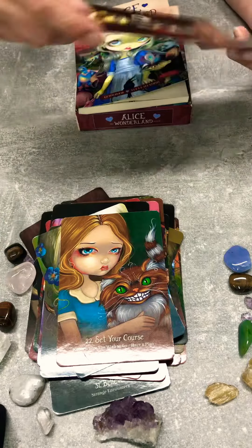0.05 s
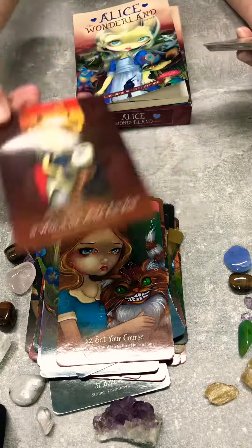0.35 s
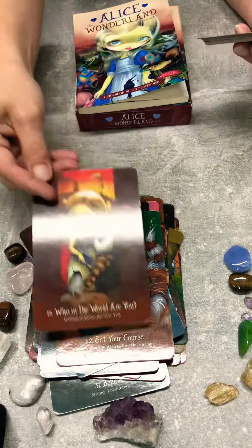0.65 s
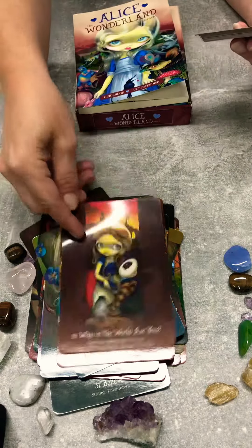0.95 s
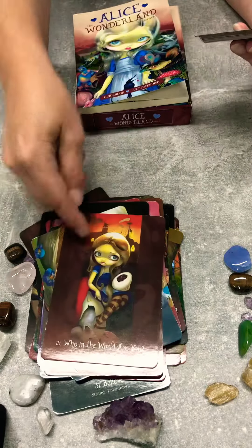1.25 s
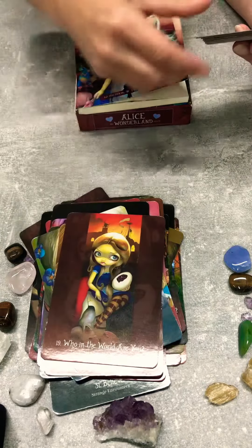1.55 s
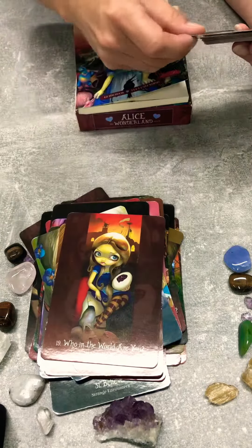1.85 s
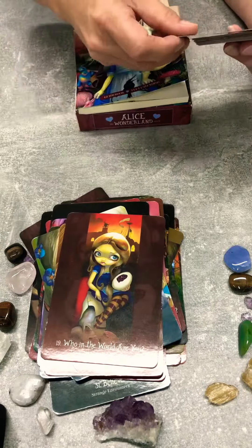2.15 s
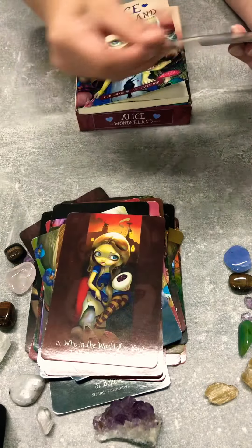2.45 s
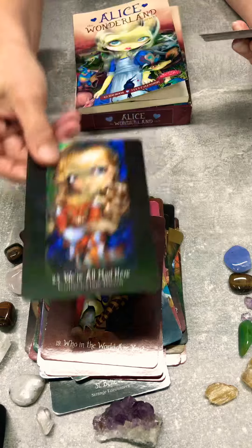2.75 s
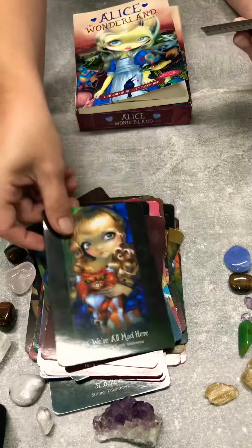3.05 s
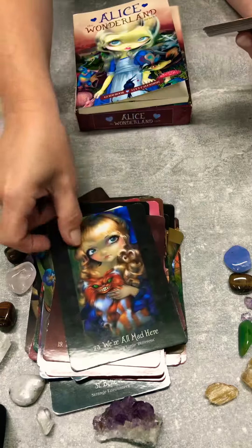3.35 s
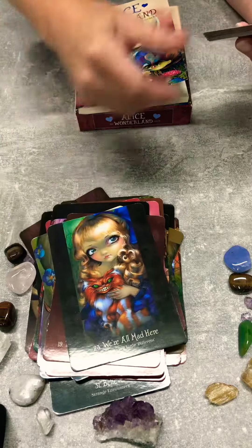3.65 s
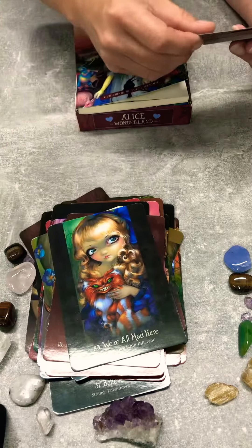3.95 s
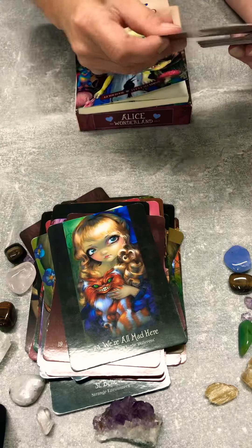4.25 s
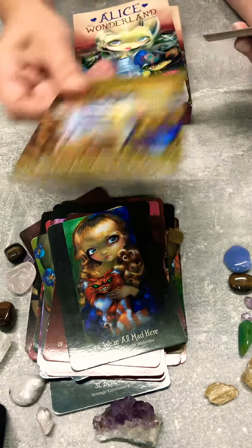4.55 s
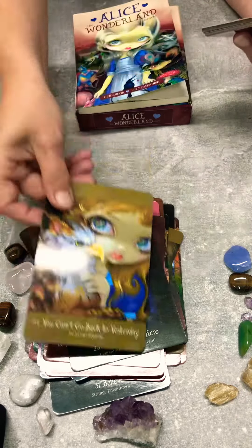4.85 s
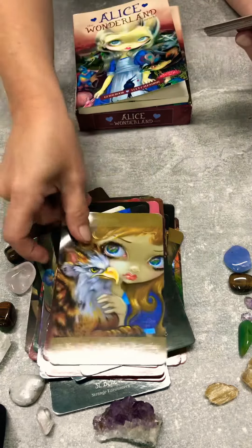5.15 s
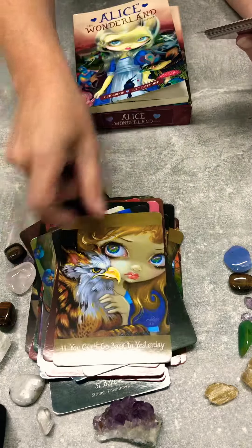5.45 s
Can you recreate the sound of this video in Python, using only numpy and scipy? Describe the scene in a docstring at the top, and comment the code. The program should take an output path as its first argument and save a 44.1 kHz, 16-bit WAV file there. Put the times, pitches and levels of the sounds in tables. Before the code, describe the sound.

Cards are laid down close by with light ticks and slides, as a bird sings a reverberant, varied phrase in a humming room.

```python
"""Cards swish and tick onto a pile close by, over a room's faint hum and a soft, distant twitter.
Then a songbird sings one phrase among echoing walls: low whistles and slurs, harsh rasps and trills,
and fainter chirps after them. Its membranes vibrate almost sinusoidally in a whistle and slap together
in a rasp; beak and throat filter the overtones. The cards sound by friction and by impact."""
import sys
import numpy as np
from scipy import signal
from scipy.fft import rfft, irfft, next_fast_len
from scipy.io import wavfile
from scipy.ndimage import uniform_filter1d, map_coordinates

SR = 44100
rng = np.random.default_rng(int(sys.argv[2]) if len(sys.argv) > 2 else 0)


def transcribe(u):
    """Save the signal u as a 16-bit wav file named by the first command-line argument.

    u: samples, shape (n,) or (channels, n), limited to [-1, 1]; the rate is SR.
    q: integer samples, one column per channel.
    """
    v = np.clip(np.atleast_2d(u).T, -1, 1)
    q = np.round(v * 32767).astype(np.int16)
    wavfile.write(sys.argv[1], SR, q)


N = 247401
TOP_HZ = 15900
# Overtone strength through the song. Each row: time in seconds, level in dB before the beak's filter.
OVERTONE_LEVELS = [(1.9, -35), (2.15, -28), (2.22, -35.5), (2.35, -39), (2.53, -30), (2.76, -44),
                   (3.05, -32), (3.2, -60), (3.46, -48), (3.6, -31), (5.5, -42)]


def syrinx(length, start_hz, end_hz, flutter_share, overtone_db):
    """Membrane tension sets pitch: a tone arches from start to end under frequency modulation."""
    t = np.arange(int(length * SR)) / SR
    progress = t / length
    arch = 0.2257 * abs(end_hz - start_hz) * (1 - (2 * progress - 1) ** 2)
    glide = start_hz + (end_hz - start_hz) * progress + arch
    centre_hz = (start_hz + end_hz) / 2
    flutter_hz = 85 * (centre_hz / 2070) ** 0.55 * (1 + 0.2346 * wobble(39.9, len(t)))
    flutter = np.sin(phase_of(flutter_hz) + rng.uniform(0, 2 * np.pi)) + 0.31 * wobble(304.8, len(t))
    pitch = glide * (1 + flutter_share * flutter)
    phase = phase_of(pitch)
    # Beak resonances that colour the overtones. Each row: frequency in Hz, gain in dB.
    beak = [(3300, -11), (4300, -13), (5300, -10.5), (7000, -27), (9000, -11.5), (10500, -20.5),
            (12300, -5.5), (13400, -32), (15000, -22), (16500, -43)]
    tone = np.sin(phase)
    for k in range(2, int(TOP_HZ / glide.max()) + 1):
        partial_db = overtone_db + along(beak, k * np.abs(pitch)) + 7.4 * wobble(56, len(t))
        tone += amp(partial_db) * np.sin(k * phase)
    shimmer = amp(1.4 * wobble(60, len(t)))
    return tone * shimmer


def whistles(edge_s=0.014, ring_rise_s=0.039, ring_t60=0.52):
    """Steady oscillation holds one pitch; reverberation sustains it after the note stops."""
    # Each row: start in seconds, length in seconds, pitch in Hz, level in dB, ring in dB against the note.
    held_notes = [(2.138, 0.11, 1782, -41, -1), (2.343, 0.095, 2065, -29.5, -18),
                  (2.436, 0.062, 2071, -32, -27), (2.673, 0.05, 2110, -29, -18),
                  (2.744, 0.094, 2348, -28, -6), (3.193, 0.026, 2119, -30, -21),
                  (3.347, 0.075, 1991, -31, -27), (3.472, 0.044, 1990, -38, -19.5),
                  (3.517, 0.048, 1985, -41.5, -12)]
    track, t = np.zeros(N), np.arange(SR) / SR
    for start, length, hz, db, ring_db in held_notes:
        overtone_db = np.interp(start, *np.transpose(OVERTONE_LEVELS))
        note = syrinx(length, hz, hz, flutter_share=0.003, overtone_db=overtone_db)
        heave = amp(2.5 * wobble(11, len(note)))
        note *= heave * swell(t[:len(note)], length, edge_s, edge_s)
        add(track, start, amp(db) * wall_echo(note, direct_db=5, build_s=0.0022))
        ring = np.sqrt(2) * np.sin(2 * np.pi * hz * t + 0.4 * wobble(11, SR))
        ring *= 1 - np.exp(-t / ring_rise_s)
        add(track, start + length, amp(db + ring_db - 60 * t / ring_t60) * ring)
    return track


def slurs():
    """Changing tension slides the pitch of each note; thin high tones sound with some of them."""
    # Each row: start and length in seconds, first and last pitch in Hz, level in dB,
    # flutter as a share of the pitch.
    glides = [(-.03, 0.1, 3804, 3610, -65, 0.033), (1.77, 0.072, 2026, 2024, -49.5, 0.005),
              (1.805, 0.063, 1960, 1658, -50.5, 0.026), (1.785, 0.076, 2290, 2500, -66, 0.011),
              (1.855, 0.015, 1700, 1710, -46, .01), (1.845, 0.038, 1480, 1440, -62, 0.018),
              (1.86, 0.041, 1920, 1830, -55, .025), (1.895, 0.031, 2430, 2400, -63, 0.013),
              (1.917, 0.023, 2134, 2070, -43, 0.016), (1.925, 0.085, 1890, 1706, -46.5, 0.027),
              (2.14, 0.095, 1718, 1758, -47, 0.029), (2.08, 0.061, 2685, 2840, -58, .015),
              (2.202, 0.03, 2050, 2120, -45, .012), (2.204, 0.085, 2170, 2545, -33, 0.012),
              (2.225, 0.1, 3110, 3970, -59.5, 0.018), (2.24, 0.079, 4940, 5240, -66.5, 0.017),
              (2.03, 0.068, 2640, 2670, -67, .008), (2.282, 0.055, 2458, 2565, -34, 0.0044),
              (2.475, 0.12, 2266, 2290, -38, 0.014), (2.505, 0.066, 2007, 1995, -39.5, 0.012),
              (2.508, 0.048, 2506, 2450, -44.5, 0.019), (2.54, 0.13, 3025, 3116, -56.5, 0.024),
              (2.568, 0.065, 2314, 2483, -38, 0.025), (2.595, 0.076, 2030, 2140, -36.5, 0.036),
              (2.715, 0.054, 2162, 2062, -35.5, 0.028), (2.765, 0.13, 2027, 1992, -40, 0.025),
              (2.47, 0.17, 9400, 8630, -67, 0.018), (2.48, 0.2, 11500, 11060, -69.5, 0.013),
              (2.49, 0.35, 11780, 11600, -74, 0.0066), (2.49, .16, 15400, 15000, -73.5, .01),
              (2.15, 0.099, 15050, 14900, -72, .006), (2.49, 0.2, 5710, 5350, -66.5, 0.032),
              (2.825, 0.13, 2262, 2308, -31.5, 0.023), (2.865, 0.074, 2538, 2455, -37.5, .007),
              (2.85, 0.067, 4790, 4810, -61.5, .005), (3.015, 0.095, 2748, 2868, -43, 0.019),
              (2.998, 0.037, 5330, 5130, -47, 0.029), (3.005, 0.078, 4100, 4450, -50, 0.044),
              (3.1, 0.05, 10800, 10500, -61.5, 0.037), (3.036, .12, 1538, 1807, -38.5, 0.021),
              (3.03, 0.092, 3020, 3194, -42.5, 0.021), (3.085, 0.11, 4170, 4160, -53, .004),
              (3.095, 0.063, 3354, 3470, -45, 0.0055), (3.09, 0.055, 5500, 5500, -54.5, 0.02),
              (3.19, 0.13, 4800, 4825, -59.5, 0.0037), (3.163, 0.069, 2122, 2063, -35.5, 0.021),
              (3.228, 0.044, 2044, 2048, -35, 0.0094), (3.49, 0.09, 2780, 2894, -49, 0.02),
              (3.545, 0.11, 3670, 3886, -52.5, 0.041), (3.695, 0.052, 4160, 4040, -48, 0.011),
              (3.685, 0.11, 5160, 5175, -54, 0.011), (3.695, 0.095, 2624, 2497, -48, 0.059),
              (3.738, 0.041, 2170, 2070, -49.5, 0.018), (3.752, 0.045, 4610, 4600, -51.5, 0.019),
              (3.8, 0.063, 2542, 2446, -48, 0.022), (3.81, 0.042, 2880, 2710, -52, .02),
              (3.875, 0.035, 3860, 3760, -57, 0.047), (4.01, 0.1, 7650, 7650, -63, 0.005),
              (4.01, 0.101, 4605, 4730, -52, 0.0061), (4.09, 0.19, 4650, 4690, -53, 0.007),
              (4.16, 0.059, 2440, 2680, -58.5, .02), (4.18, 0.11, 6270, 6200, -55, 0.017),
              (4.17, 0.2, 7430, 7050, -69, .012), (4.325, 0.08, 4556, 4624, -50.5, 0.012),
              (4.45, 0.089, 4536, 4590, -50, 0.011), (4.48, 0.07, 4600, 4900, -59, 0.0097),
              (4.427, 0.077, 3234, 3330, -51, 0.01), (4.6, 0.15, 2928, 2982, -53, 0.01),
              (4.8, .11, 2957, 2977, -63, 0.0065), (4.874, 0.071, 3770, 4050, -55.5, .008),
              (4.934, 0.037, 3880, 3060, -54.5, 0.035), (4.992, 0.11, 2356, 2500, -55, 0.024),
              (5.16, 0.046, 3330, 2790, -60.5, 0.011), (5.19, 0.047, 2723, 2646, -54.5, 0.0067),
              (5.29, 0.03, 2234, 2510, -58.5, 0.029), (5.399, 0.073, 2200, 2520, -59, .012),
              (5.434, 0.062, 5390, 5740, -56.5, 0.026), (5.498, 0.09, 3050, 3190, -57, 0.0058)]
    return sing(glides, direct_db=-0.5, build_s=0.0018)


def rasps(jitter_rate=700, sink_octaves_per_s=0.44, air_db=-8):
    """Source and filter: membranes slap at an uneven rate, and the throat shapes their harmonics."""
    # Each row: start and length in seconds, first and last pitch in Hz, level in dB,
    # jitter as a share of the pitch, treble sizzle in dB.
    harsh_notes = [(2.986, 0.084, 791.8, 788, -50, 0.013, -0.5), (3.052, 0.093, 774, 770, -53.5, 0.026, 2),
                   (3.691, 0.095, 1360, 1320, -50.5, 0.014, -10), (3.854, 0.08, 645.4, 631, -47, 0.02, -26),
                   (3.994, 0.139, 792, 770.6, -49.5, 0.015, 0), (4.127, 0.23, 798, 771, -53.5, 0.03, 1.5)]
    # Throat resonances. Each row: frequency in Hz, gain in dB.
    throat = [(1500, -22), (2400, 0), (3200, 5), (4000, 9), (5400, 6), (6300, 6.5), (7000, -4),
              (7900, -0.5), (8700, -18), (9500, -27), (10800, -14), (12000, 1), (13000, -20),
              (13900, -12.5), (15500, -15.5)]
    # Crossover into the sizzle: lower and upper edge in Hz.
    sizzle_band = [5850, 7000]
    track = np.zeros(N)
    for start, length, start_hz, end_hz, db, jitter, sizzle_db in harsh_notes:
        t = np.arange(int(length * SR)) / SR
        pitch = np.linspace(start_hz, end_hz, len(t)) * (1 + jitter * wobble(jitter_rate, len(t)))
        phase = phase_of(pitch)
        sink = 2 ** (sink_octaves_per_s * (t - length / 2))  # the resonances fall during the note
        buzz = np.zeros(len(t))
        for k in range(1, int(TOP_HZ / start_hz)):
            hz = k * start_hz
            partial_db = along(throat, hz * sink) + np.interp(hz, sizzle_band, [0, sizzle_db])
            buzz += amp(partial_db + 5 * wobble(37.5, len(t))) * np.sin(k * phase)
        colour = [(hz, gain + np.interp(hz, sizzle_band, [0, sizzle_db])) for hz, gain in throat]
        air = unit(noise(colour, len(t)) * (1 + np.cos(phase)))  # one turbulent puff per slap
        note = (unit(buzz) + amp(air_db) * air) * swell(t, length, attack_s=0.014, release_s=0.021)
        add(track, start, amp(db) * wall_echo(note, direct_db=0, build_s=0.011))
    return track


def trills():
    """Fast, wide frequency modulation spreads a note into buzzy sidebands; higher notes shake wider."""
    # Each row: start in seconds, length in seconds, centre pitch in Hz, level in dB.
    shaken_notes = [(2.66, 0.24, 4320, -61.5), (2.803, 0.079, 2600, -45.5), (3.747, 0.065, 4960, -55),
                    (3.788, 0.076, 3380, -49.5)]
    notes = [(start, length, hz, hz, db, 0.12 * hz / 3860) for start, length, hz, db in shaken_notes]
    return sing(notes, direct_db=2, build_s=0.026)


def twitter(spacing_s=0.15, length_s=0.052, flutter_share=0.057):
    """Faint frequency-modulated chirps, loosely spaced, each glide between two chance pitches."""
    # Each row: start and end in seconds, lowest and highest pitch in Hz, level in dB.
    bouts = [(0.36, 1.1, 3870, 4220, -72.5), (3.425, 3.5, 3580, 3790, -58.5),
             (4.561, 4.62, 3670, 3950, -60.5)]
    notes = []
    for start, end, low_hz, high_hz, db in bouts:
        for beat in np.arange(start, end, spacing_s):
            glide = rng.uniform(low_hz, high_hz, 2)
            onset = beat + 0.015 * rng.normal()
            notes.append((onset, length_s, *glide, db + 2 * rng.normal(), flutter_share))
    return sing(notes, direct_db=-3, build_s=0.0044)


def sing(notes, direct_db, build_s):
    """Each gliding oscillation swells, stops quickly and is reflected by the walls."""
    track = np.zeros(N)
    for start, length, start_hz, end_hz, db, flutter_share in notes:
        overtone_db = np.interp(start, *np.transpose(OVERTONE_LEVELS))
        note = syrinx(length, start_hz, end_hz, flutter_share, overtone_db)
        note *= swell(np.arange(len(note)) / SR, length, attack_s=0.33 * length, release_s=0.0058)
        add(track, start, amp(db) * wall_echo(note, direct_db, build_s))
    return track


def swell(t, length, attack_s, release_s):
    """The amplitude envelope of a valve that opens and closes smoothly."""
    opening = np.clip(np.minimum(t / attack_s, (length - t) / release_s), 0, 1)
    return np.sin(np.pi / 2 * opening) ** 2


def wall_echo(note, direct_db, build_s):
    """Reverberation follows the direct sound, its treble dying sooner. The loudest moment has rms 1."""
    # Decay between the walls. Each row: frequency in Hz, time to fall 60 dB in seconds.
    decay_times = [(1500, 1), (2400, 0.63), (3400, 0.93), (5000, 0.74), (8000, 0.5), (12000, 0.38)]
    hz, t, spectra = signal.stft(rng.standard_normal(SR), SR, nperseg=256)
    decay = amp(-60 * t / along(decay_times, hz)[:, None])
    response = signal.istft(spectra * decay, SR, nperseg=256)[1][:SR]
    response *= 1 - np.exp(-np.arange(SR) / SR / build_s)
    response /= np.linalg.norm(response)
    response[0] = amp(direct_db)
    heard = signal.fftconvolve(note, response)
    return heard / np.sqrt(uniform_filter1d(heard ** 2, size=1300).max())


def card_ticks(attack_s=0.00095, snap_t60=0.012, knock_t60=0.034, room_t60=0.18):
    """Damped impact: a card's edge snaps and knocks the pile; the room answers faintly."""
    # Each row: time in seconds, snap level in dB, snap tilt in dB per octave, knock level in dB.
    impacts = [(0.375, -62, -5.5, -65), (0.395, -49.5, -8.5, -52), (0.681, -52, -5, -48.5),
               (1.0015, -38, 4.5, -50.5), (1.6484, -53.5, -0.5, -53), (2.4767, -52, 7, -57),
               (2.484, -49.5, -0.5, -55), (2.906, -56, -2, -51), (3.2238, -38.5, 7.5, -56),
               (4.122, -52.5, -2, -72), (4.142, -41, -4.5, -71), (4.2665, -48.5, 32, -70),
               (4.8805, -52, -0.5, -47.5), (4.956, -47, -5, -52), (5.1865, -38.5, -3, -55)]
    # Spectra of the snapping edge and the knocked pile. Each row: frequency in Hz, relative level in dB.
    snap_spectrum = [(80, -7.5), (250, 6.5), (1500, -13), (2200, -4), (2700, 8), (3400, 2), (4200, 13.5),
                     (4600, 7.5), (5100, 11.5), (6200, 6), (8000, 5.5), (12000, -0.5), (15500, -4)]
    pile_spectrum = [(60, -10), (160, -12), (600, 12), (1500, 13), (4000, 4.5), (9000, -65)]
    track, t = np.zeros(N), np.arange(-SR // 50, SR // 4) / SR
    after = np.maximum(t, 0)
    rise = np.exp(np.minimum(t, 0) / attack_s)
    hiss = amp(-24) * np.exp(-np.abs(t) / 0.015)  # a soft hiss swells into each snap and fades after it
    room_tail = amp(-33 - 60 * after / room_t60)
    snap_envelope = rise * (amp(-60 * after / snap_t60) + room_tail) + hiss
    for time, snap_db, tilt, knock_db in impacts:
        colour = [(hz, db + tilt * np.log2(hz)) for hz, db in snap_spectrum]
        snap = noise(colour, len(t)) * snap_envelope
        knock = noise(pile_spectrum, len(t)) * rise * amp(-60 * after / knock_t60)
        add(track, time + t[0], amp(snap_db) * snap + amp(knock_db) * knock)
    return track


def card_slides(grain_db=3, catches_per_s=230, catch_decay_s=0.0004, crackle_db=-15.5):
    """Sliding friction of card on card gives a swish, with crackles where the paper's fibres catch."""
    # Each row: start in seconds, length in seconds, level in dB.
    strokes = [(0.035, 0.14, -60.5), (0.359, 0.051, -59.5), (0.711, 0.12, -68), (0.916, 0.094, -70),
               (1.999, 0.091, -64.5), (2.352, 0.12, -54), (4.053, 0.21, -60.5), (4.252, 0.038, -64.5),
               (4.292, 0.094, -59.5), (4.372, 0.044, -63), (5.095, 0.14, -66.5)]
    # Spectrum of rubbing paper. Each row: frequency in Hz, relative level in dB.
    swish = [(300, -37), (2000, 1.5), (4000, 1), (7500, 0.5), (11000, -1), (15500, 0)]
    track = np.zeros(N)
    for start, length, db in strokes:
        size = int(length * SR)
        rub = unit(noise(swish, size) * amp(grain_db * wobble(420, size)))
        catches = (rng.random(size) < catches_per_s / SR) * rng.uniform(0.2, 1, size)
        bursts = signal.lfilter([1], [1, -np.exp(-1 / (catch_decay_s * SR))], catches)
        crackle = unit(noise(swish, size) * bursts)
        envelope = np.sin(np.linspace(0, np.pi, size))
        add(track, start, amp(db) * (rub + amp(crackle_db) * crackle) * envelope)
    return track


def card_flicks(hz=1520, rise_s=0.0041, t60=0.089):
    """Damped resonance: a card catches twice as it leaves the deck and rings briefly and hollowly."""
    # Each row: start in seconds, level in dB.
    catches = [(4.341, -50), (4.384, -43.5)]
    track, t = np.zeros(N), np.arange(SR // 8) / SR
    for start, db in catches:
        ring = noise([(hz / 2, -30), (hz, 0), (hz * 2, -50)], len(t))
        add(track, start, amp(db - 60 * t / t60) * ring * (1 - np.exp(-t / rise_s)))
    return track


def room(waver_hz=2.75, air_db=-55.5):
    """An appliance's slightly unsteady line spectrum stands on the broadband noise of the air."""
    # Partials of the hum. Each row: frequency in Hz, level in dB.
    hum_lines = [(120, -69), (179, -64.5), (259, -65.5), (474, -70), (888, -85.5), (969, -74), (1037, -71),
                 (1825, -72.5), (2487, -77), (2649, -78.5)]
    # Air noise. Each row: frequency in Hz, relative spectral density in dB.
    air_spectrum = [(22, -40.5), (36, -6.5), (86, -14), (113, -2), (235, -3.5), (261, -1), (400, -8.5),
                    (812, -8.5), (1360, -15), (1820, -19), (1980, -18), (2520, -22), (3130, -25),
                    (4100, -26.5), (7220, -36.5), (15800, -44)]
    hum = np.zeros(N)
    for hz, db in hum_lines:
        level = amp(db + 0.24 * wobble(12, N))
        hum += level * np.sqrt(2) * np.sin(phase_of(hz + waver_hz * wobble(20, N)))
    return amp(air_db) * noise(air_spectrum, N) + hum


def amp(db):
    """Decibels to gain."""
    return 10 ** (np.asarray(db) / 20)


def unit(x):
    """Scale to rms 1."""
    return x / np.sqrt(np.mean(x ** 2) + 1e-20)


def phase_of(hz):
    """Phase in radians is the running integral of frequency."""
    return 2 * np.pi * np.cumsum(hz) / SR


def along(points, hz):
    """Interpolate (Hz, value) points on a logarithmic frequency axis."""
    frequencies, values = np.transpose(points)
    return np.interp(np.log(hz + 1), np.log(frequencies + 1), values)


def wobble(rate, size):
    """A smooth random curve with rate knots a second."""
    knots = rng.standard_normal(int(size * rate / SR) + 4)
    return map_coordinates(knots, [np.arange(size) * rate / SR])


def noise(spectrum, size):
    """White noise filtered to a (Hz, dB) spectrum, with rms near 1."""
    padded = next_fast_len(size + 2048)
    gain = amp(along(spectrum, np.fft.rfftfreq(padded, 1 / SR)))
    return unit(irfft(rfft(rng.standard_normal(padded)) * gain, padded))[:size]


def add(track, start, sound):
    """Superpose a sound on the track from start, in seconds."""
    i = round(start * SR)
    part = sound[max(0, -i):len(track) - i]
    track[max(0, i):][:len(part)] += part


def scene():
    """Superposition in one channel: the bird outside, the cards and the room close by."""
    background = room()
    cards = card_ticks() + card_slides() + card_flicks()
    bird = rasps() + whistles() + slurs() + trills() + twitter()
    return (bird + cards + background)[None]


def record(dry):
    """An ideal low-pass filter removes everything above the band limit."""
    padded = next_fast_len(N + SR // 2)
    passband = np.fft.rfftfreq(padded, 1 / SR) < TOP_HZ
    return irfft(rfft(dry, padded) * passband, padded)[..., :N]


dry = scene()
out = record(dry)
transcribe(out)
```